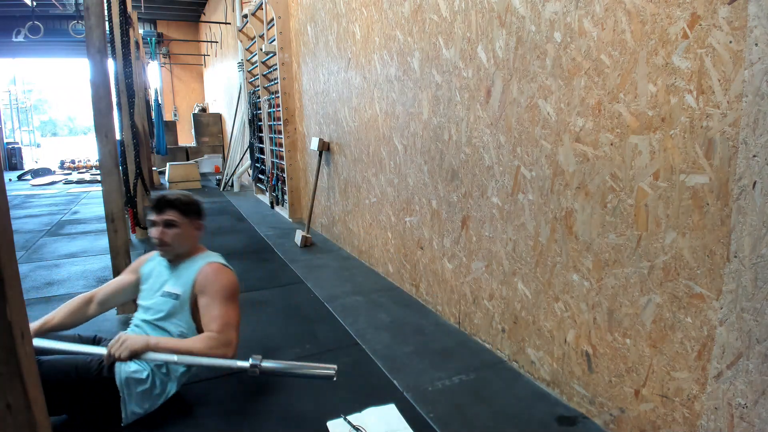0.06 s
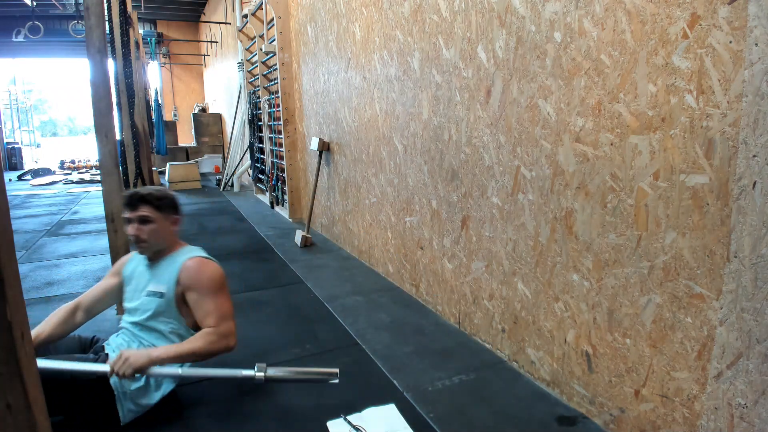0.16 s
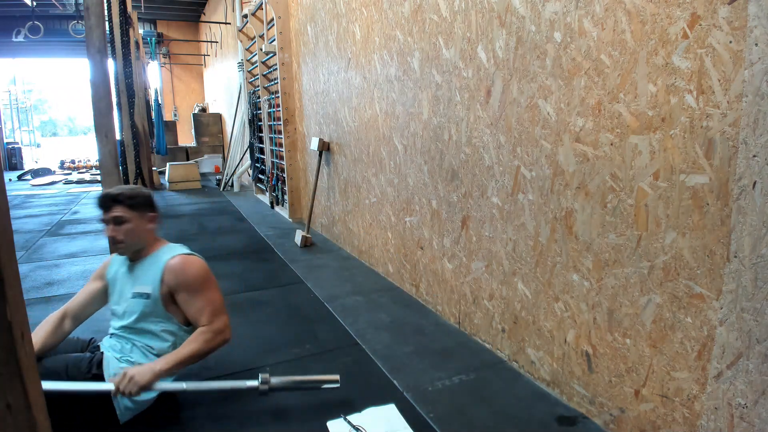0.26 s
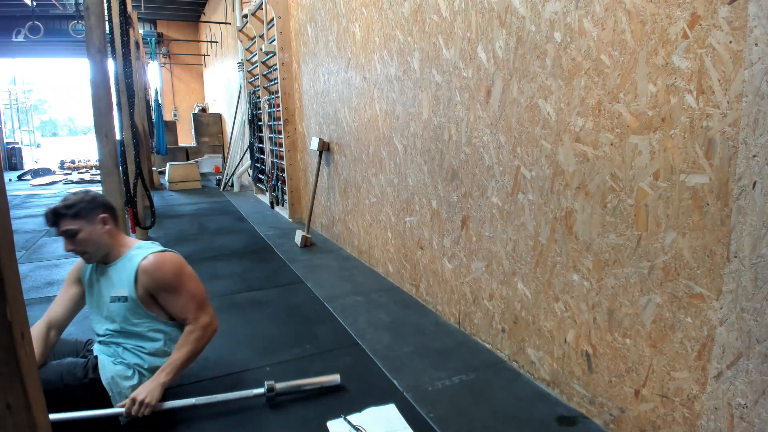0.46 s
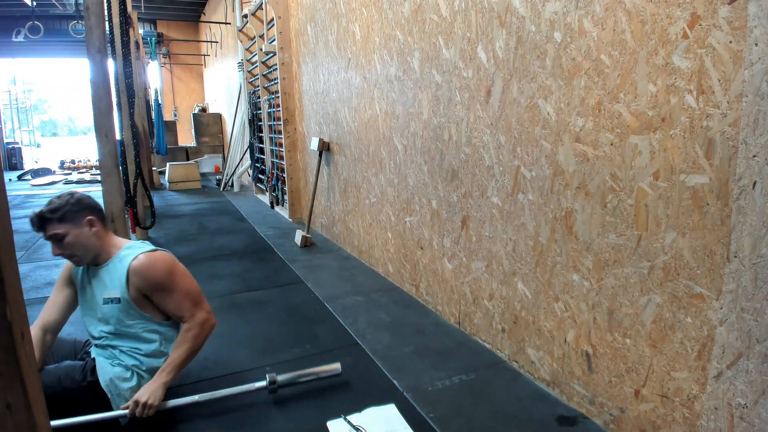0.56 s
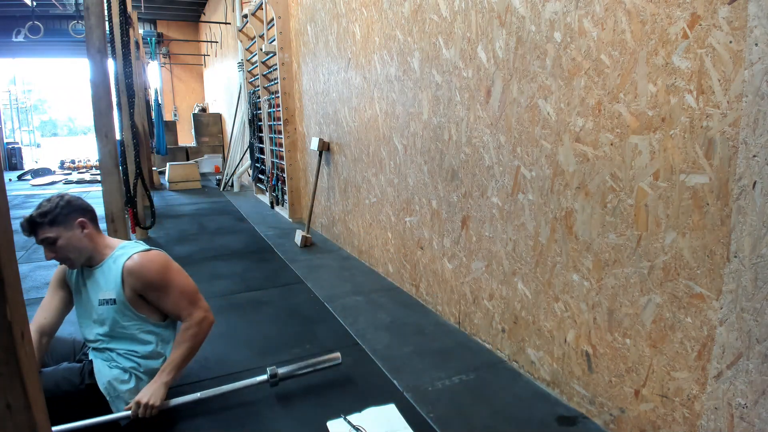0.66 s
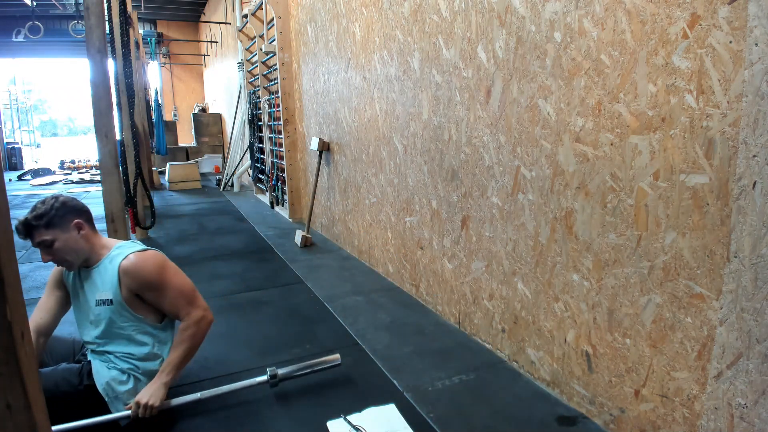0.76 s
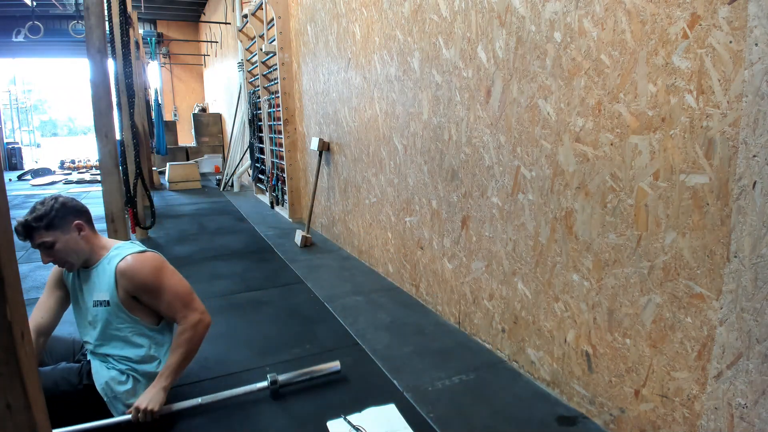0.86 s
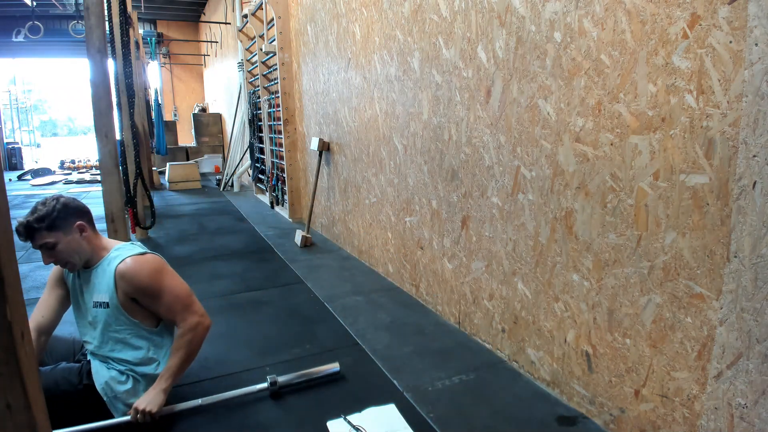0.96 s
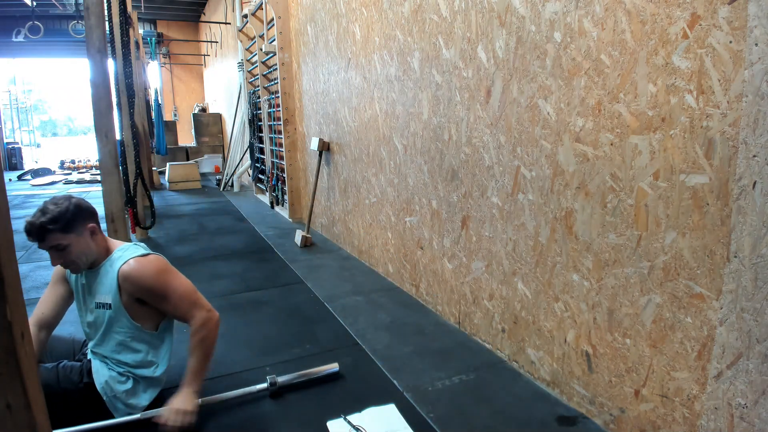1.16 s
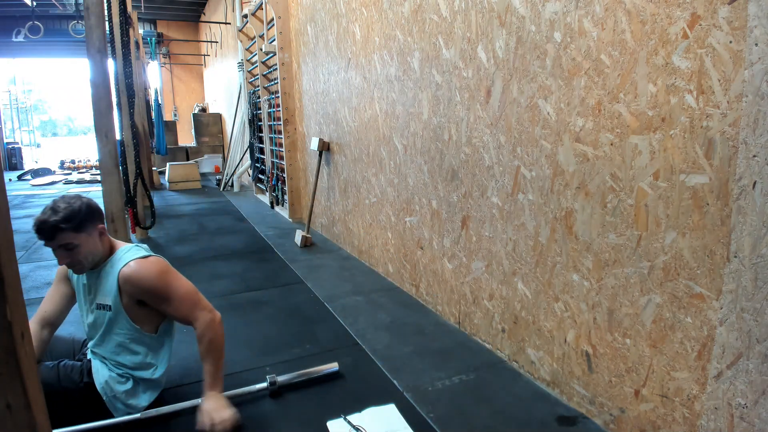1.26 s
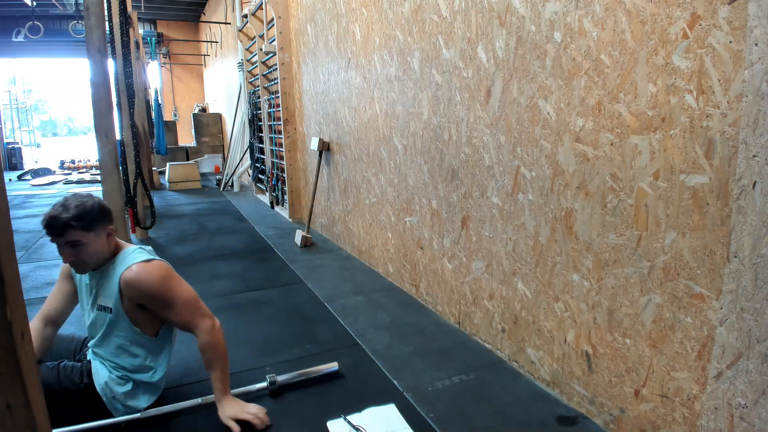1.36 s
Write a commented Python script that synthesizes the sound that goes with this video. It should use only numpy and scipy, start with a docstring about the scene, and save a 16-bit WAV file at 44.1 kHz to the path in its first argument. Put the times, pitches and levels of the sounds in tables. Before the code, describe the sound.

A light steel barbell clinks sharply at about 0.25 seconds, bumping dully on a rubber gym floor. A louder rattle of its loose sleeve follows at 0.5 seconds. From 0.75 to 1 second it chatters more softly, with two more faint bumps, then settles. The clinks ring briefly, slightly to the left, and fade in a short hall echo over a faint low rumble that comes and goes.

```python
"""Steel clinks and rattles as a light barbell is set down and shifted on a rubber gym floor.
Its loose sleeve knocks and chatters on the shaft, and each knock cracks and rings briefly.
The bar bumps dully on the rubber, and the hall, with a wooden wall close by, carries the clinks on.
A steady low room rumble is heard while the recorder's noise gate is open and fades as it closes."""
import sys
import numpy as np
from scipy import signal
from scipy.fft import rfft, irfft
from scipy.io import wavfile
from scipy.ndimage import uniform_filter1d

SR = 44100
rng = np.random.default_rng(int(sys.argv[2]) if len(sys.argv) > 2 else 0)


def inscribe(sig):
    """Save sig as 16-bit PCM at rate SR to the path in sys.argv[1].

    A 1-D sig is mono; a 2-D sig holds one channel per row.
    Samples are clipped to [-1, 1] before scaling.
    """
    pcm = np.round(np.clip(np.atleast_2d(sig).T, -1, 1) * 32767)
    wavfile.write(sys.argv[1], SR, pcm.astype(np.int16))


N = 61739


def sleeve_knock(chatter_s, low_db, middle_db, high_db, crack_db):
    """The sleeve hits the shaft: steel tones and a noisy crack last while it chatters, then die away."""
    # the tones at which sleeve and shaft ring: pitch_hz
    tone_pitches = [349, 920, 1250, 1520, 1830, 2420, 2530, 2589, 2640, 3360, 3818, 4265, 4805, 4865, 4930,
                    4978, 5040, 5265, 5767, 5880, 6560, 6690, 6735, 7440, 7520, 9170, 9245, 11500, 12600,
                    13860]
    # how strong each tone is: level_db
    tone_levels = [-38, -19, -19, -16.5, -12, -17.5, -18, -3, -0.5, -14.5, -18.5, -11.5, -3, -3.5, -19.5,
                   -4, 0, -11, -5.5, -6.5, -3, -10, -7.5, -3.5, -4, -4.5, -5.5, -8.5, -11, -11.5]
    # how long each tone takes to fall by 60 dB: fade_s
    tone_fades = [.15, .06, .07, .06, .06, .08, .25, .08, .06, .05, .1, .05, .06, .05, .3, .07, .055, .06,
                  .08, .07, .07, .07, .07, .06, .07, .05, .07, .04, .07, .08]
    # the tone colour of the crack: pitch_hz, level_db
    crack_colour = [(59, -61.5), (100, -20), (360, -14.5), (761, -15), (1410, -7), (1830, -9.5),
                    (2570, -3.5), (3180, -9.5), (4990, -3.5), (8330, -6.5), (9070, -9), (11200, -12.5),
                    (12200, -12), (14500, -14.5), (16500, -22)]
    t = np.arange(16384) / SR
    since_chatter_s = np.maximum(t - chatter_s, 0)
    hz = np.array(tone_pitches)[:, None]
    strength, detune, phase, ear_shift = rng.standard_normal((4, len(hz), 1))
    band_db = np.where(hz < 3000, low_db, np.where(hz > 5500, high_db, middle_db))
    tone_db = np.array(tone_levels)[:, None] + band_db + 1.5 * strength  # no two knocks are alike
    fade_db = 60 * since_chatter_s / np.array(tone_fades)[:, None]
    cycles = phase + t * hz * (1 + .002 * detune)
    tones = gain_of(tone_db - fade_db) * np.exp(2j * np.pi * cycles)
    # each tone is a little out of step between the two ears
    ear_turns = np.exp(.24j * np.hstack([-ear_shift, ear_shift]))
    build_up = np.sin(np.pi / 2 * np.minimum(t / (.53 * chatter_s), 1))
    sound = gain_of(-13) * (ear_turns.T @ tones).imag * build_up
    crack_shape = np.minimum(t / .00037, 1) * gain_of(-60 * since_chatter_s / .011)
    noise = partly_alike(rng.standard_normal((2, 4096)), likeness=.46)
    add(sound, 0, gain_of(crack_db - 5) * crack_shape[:4096] * coloured(noise, crack_colour))
    return sound


def floor_thud(level_db, pitch_hz, rise_s=.004, fade_s=.09):
    """The bar meets the rubber floor: a dull, low bump whose pitch sags."""
    t = np.arange(8192) / SR
    loudness = gain_of(level_db - 60 * t / fade_s) * np.minimum(t / rise_s, 1)
    return loudness * np.sin(2 * np.pi * pitch_hz * t * (1 - .8 * t))


def hall_echo(sound, tail_start_s=.0013, tail_rise_s=.0033, tail_db=-3):
    """The hall sends back a few near echoes and a smooth tail, each pitch fading at its own speed."""
    # how long the tail takes to fall by 60 dB: pitch_hz, fade_s
    hall_fades = [(100, .6), (400, 0.34), (1100, 0.6), (2900, 0.73), (5000, 0.52), (8000, 0.51),
                  (15000, 0.47)]
    # how alike the tail is in the two ears: pitch_hz, likeness (0 to 1)
    ear_likeness = [(100, 0.46), (700, 1), (2000, 0), (5000, 0.015), (9000, 0)]
    # the first echoes: left_delay_s, right_delay_s, level_db
    near_echoes = [(.0031, 0.0033, -9), (.0058, .0066, -11.5), (.012, 0.013, -14)]
    hz, t, bands = signal.stft(rng.standard_normal((2, SR)), SR, nperseg=256)
    bands = partly_alike(bands, value_at(ear_likeness, hz)[:, None])
    fade = gain_of(-60 * t / value_at(hall_fades, hz)[:, None])
    tail = signal.istft(bands * fade, SR, nperseg=256)[1][:, :SR]
    tail *= np.clip((np.arange(SR) / SR - tail_start_s) / tail_rise_s, 0, 1)
    tail = gain_of(tail_db) * tail / np.linalg.norm(tail, axis=1, keepdims=True)
    for left_s, right_s, level_db in near_echoes:
        tail[0, round(left_s * SR)] += gain_of(level_db)
        tail[1, round(right_s * SR)] += gain_of(level_db)
    return signal.fftconvolve(sound[None], tail, axes=1)[:, :N]


def room_rumble():
    """A steady low room rumble, heard while the recorder's noise gate is open and fading as it closes."""
    # the tone colour of the rumble: pitch_hz, level_db
    rumble_colour = [(12, -29), (20, 0.5), (149, -12.5), (183, -12), (532, -17.5), (665, -25.5), (900, -15),
                     (1170, -64.5), (1980, -120)]
    # the rumble's level as the gate opens and closes at set times: time_s, level_db
    gate_levels = [(0.0, -57), (0.214, -84.5), (0.244, -54), (0.42, -61.5), (0.482, -76), (0.528, -52),
                   (0.626, -54.5), (0.79, -57.5), (0.806, -58), (0.898, -51), (1.366, -77), (1.4, -76.5)]
    noise = rng.standard_normal((3, N))  # left, right, shared
    rumble = coloured(noise[:2] + .7 * noise[2], rumble_colour + [(22050, -130)])
    time_s, level_db = np.transpose(gate_levels)
    return rumble * gain_of(np.interp(np.arange(N) / SR, time_s, level_db))


def gain_of(db):
    """Turn decibels into a number to multiply by."""
    return 10 ** (np.asarray(db) / 20)


def value_at(points, hz):
    """Read a value between the rows of a (pitch_hz, value) table."""
    pitches, values = np.transpose(points)
    return np.interp(np.log(hz + 1), np.log(pitches + 1), values)


def coloured(noise, colour):
    """Give noise a tone colour, then set its average strength (rms) to 1."""
    length = noise.shape[-1]
    gains = gain_of(value_at(colour, np.fft.rfftfreq(length, 1 / SR)))
    shaped = irfft(rfft(noise) * gains, length)
    return shaped / np.sqrt(np.mean(shaped ** 2))


def partly_alike(noises, likeness):
    """Blend two noises into left and right: likeness 0 keeps them apart, 1 makes them the same."""
    left, other = noises
    return np.array([left, likeness * left + np.sqrt(1 - likeness ** 2) * other])


def add(mix, start_s, sound):
    """Add a sound to the mix, cutting off what runs past the end."""
    part = mix[:, round(start_s * SR):][:, :sound.shape[-1]]
    part += sound[..., :part.shape[-1]]


def scene():
    """The barbell knocks and thuds, slightly to the left, with the hall and the rumble behind it."""
    # knocks of sleeve on shaft: start_s, chatter_s, low_db, middle_db, high_db, crack_db
    knocks = [(.2433, 0.0016, -17.5, -8, -9, -8), (.255, 0.0044, -32, -18.5, -24, -25),
              (0.2619, 0.0051, -23.5, -15, -19.5, -19.5), (0.276, .003, -53, -42, -22, -19),
              (0.2941, 0.0028, -44, -26, -37, -45), (.2995, 0.002, -42, -37, -21, -23),
              (.311, 0.0026, -29, -49, -27, -46), (.318, 0.0042, -27, -19.5, -26, -24.5),
              (0.5173, 0.0037, -17.5, -5, -36, -8.5), (0.5229, 0.0078, -7, -16, -6, -16.5),
              (0.529, 0.003, -15.5, -6.5, -22, -12), (0.5362, .003, -21, -10, -21, -16),
              (.5455, 0.0033, -27, -12.5, -11, -17.5), (0.5514, 0.0027, -16.5, -16.5, -40, -17.5),
              (.556, 0.0034, -29, -24.5, -28, -23.5), (.564, 0.0018, -21.5, -26, -36, -22),
              (.572, 0.0036, -26.5, -14.5, -29, -22.5), (0.588, .004, -48, -31, -17, -20.5),
              (0.595, 0.012, -35, -27, -26.5, -28), (0.602, 0.0015, -27, -40, -37, -51),
              (0.7646, 0.005, -21, -30, -34.5, -25), (0.7721, 0.0068, -27.5, -28, -19, -20.5),
              (.781, 0.0065, -16.5, -17.5, -28, -27), (.788, 0.0068, -27, -23, -40, -21),
              (.796, 0.0066, -19.5, -15, -20, -31), (.806, .008, -27, -24, -24.5, -37),
              (0.8328, 0.0016, -43, -20, -29, -25.5), (0.8364, 0.0052, -23, -11.5, -22.5, -23),
              (0.852, 0.0025, -21.5, -36, -32, -31.5), (0.8606, 0.0073, -25, -24, -31, -27.5),
              (0.8871, 0.002, -26, -14, -19.5, -23), (0.9014, 0.012, -22, -23.5, -26.5, -16.5),
              (0.9149, 0.0076, -25.5, -12, -21.5, -25), (.919, 0.0013, -14, -33, -32, -29),
              (.925, 0.0113, -14, -24.5, -26, -22.5), (0.941, 0.0011, -35, -25, -24.5, -28),
              (.957, 0.0038, -33, -30, -36, -27.5), (.9655, 0.0036, -23, -20, -40, -25),
              (0.9844, 0.0011, -51, -21, -37, -26), (0.995, 0.0054, -27.5, -29, -37.5, -37),
              (1.009, 0.0045, -53, -44, -44, -39)]
    # bumps of the bar on the rubber: start_s, level_db, pitch_hz
    thuds = [(0.243, -38.5, 230), (0.517, -48, 88), (0.774, -41.5, 126), (0.903, -49, 303)]
    bar = np.zeros((2, N))
    for start_s, *knock in knocks:
        add(bar, start_s, sleeve_knock(*knock))
    for start_s, level_db, pitch_hz in thuds:
        add(bar, start_s, floor_thud(level_db, pitch_hz))
    lean_left = gain_of([[.92], [-.92]])
    return bar * lean_left + hall_echo(bar.mean(0)) + room_rumble()


def record(dry, quiet_db=-98, ceiling=.9, top_hz=16100):
    """A noise suppressor turns very quiet pitches down; peaks are rounded and the top treble is cut."""
    bands = signal.stft(dry, nperseg=512, noverlap=384)[2]
    power = (abs(bands) ** 2).mean(0)
    power = uniform_filter1d(power, size=5, axis=0)  # smooth across pitch
    power = uniform_filter1d(power, size=9, axis=1)  # smooth across time
    under_db = np.minimum(10 * np.log10(abs(power) + 1e-20) - quiet_db, 0)
    cleaned = signal.istft(bands * gain_of(.7 * under_db), nperseg=512, noverlap=384)[1][:, :N]
    rounded = ceiling * np.tanh(cleaned / ceiling)
    treble_cut = signal.firwin(255, top_hz, window=("kaiser", 9), fs=SR)
    return signal.oaconvolve(rounded, treble_cut[None], "same")


dry = scene()
out = record(dry)
inscribe(out)
```